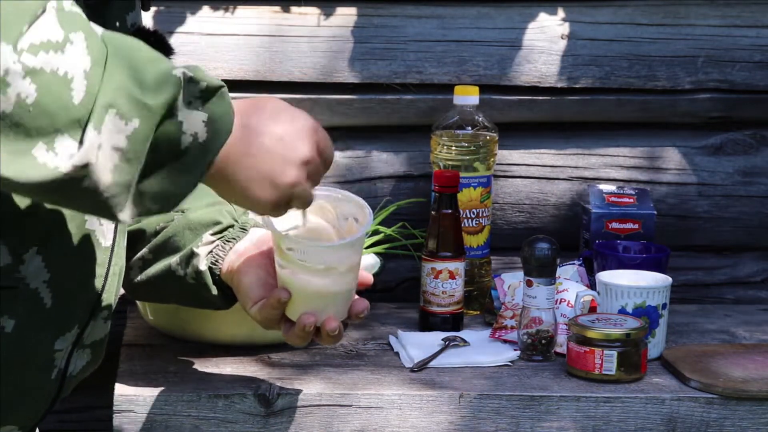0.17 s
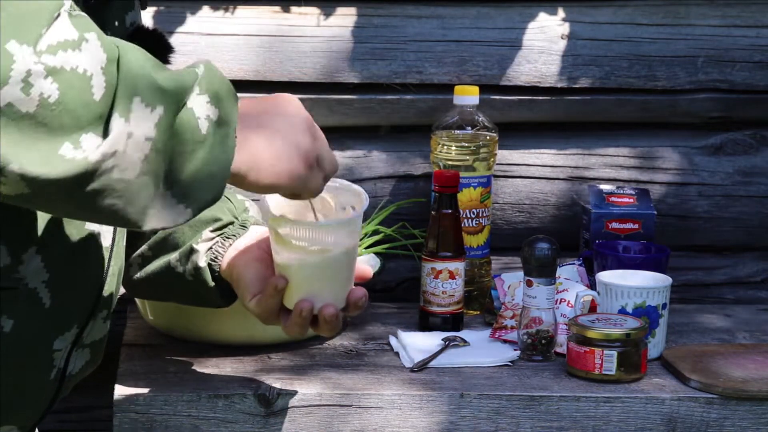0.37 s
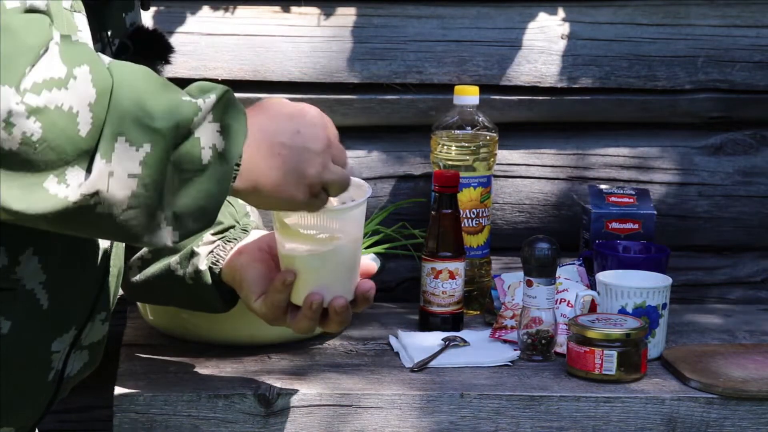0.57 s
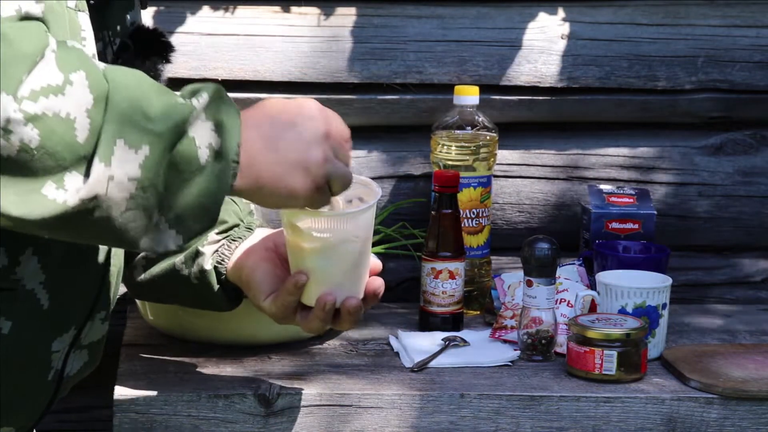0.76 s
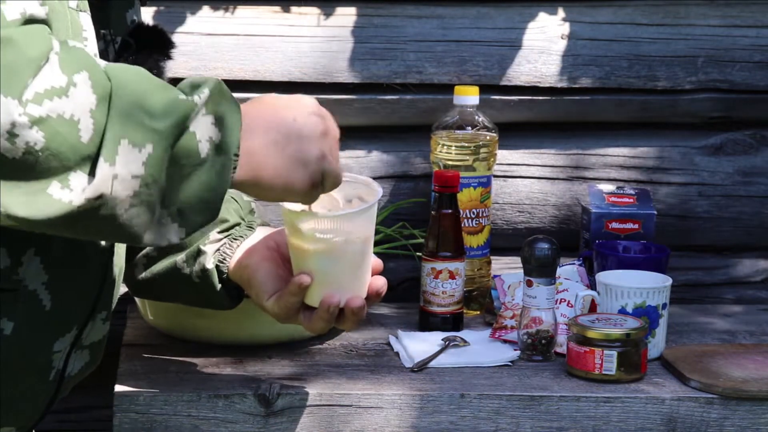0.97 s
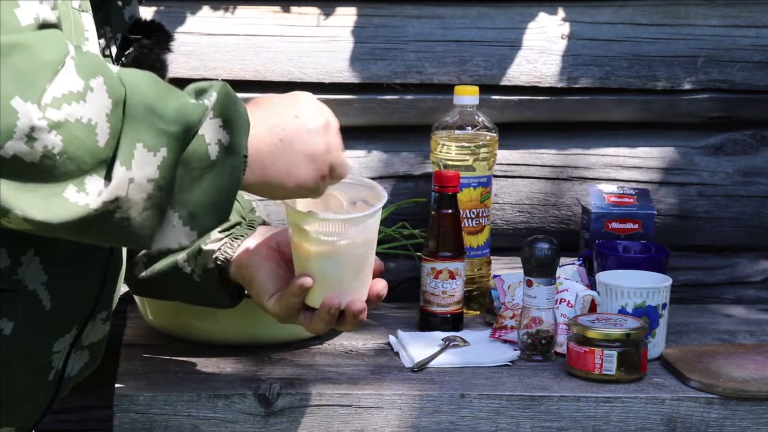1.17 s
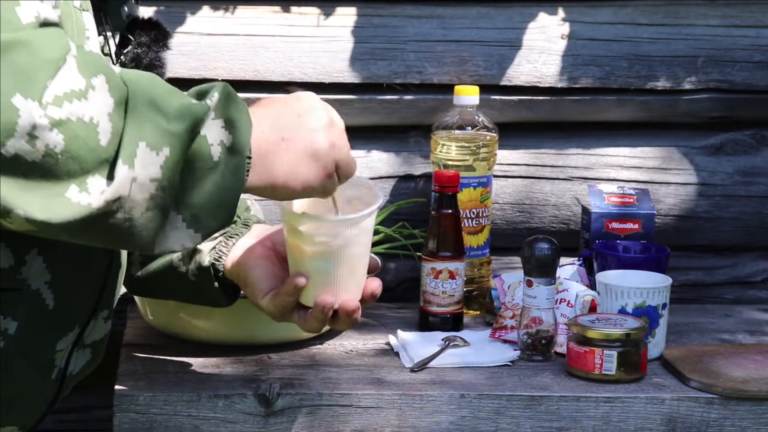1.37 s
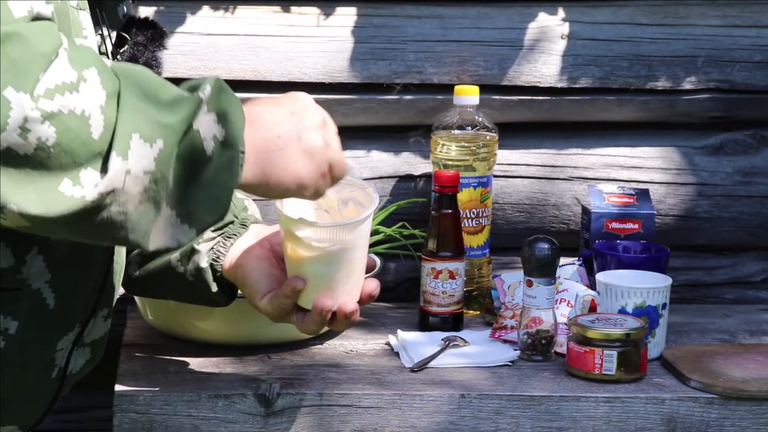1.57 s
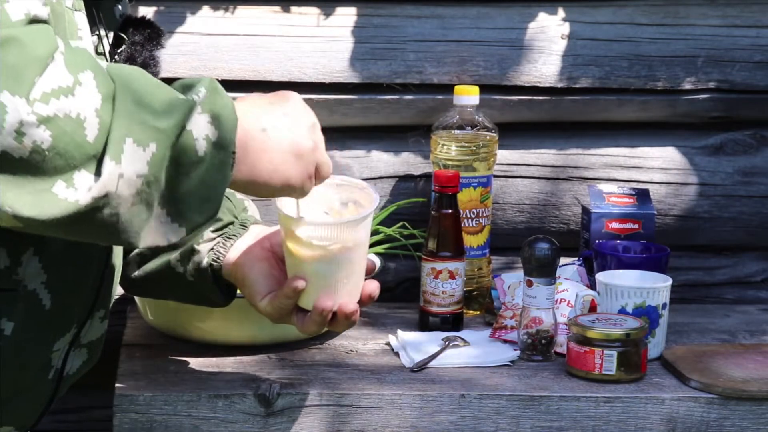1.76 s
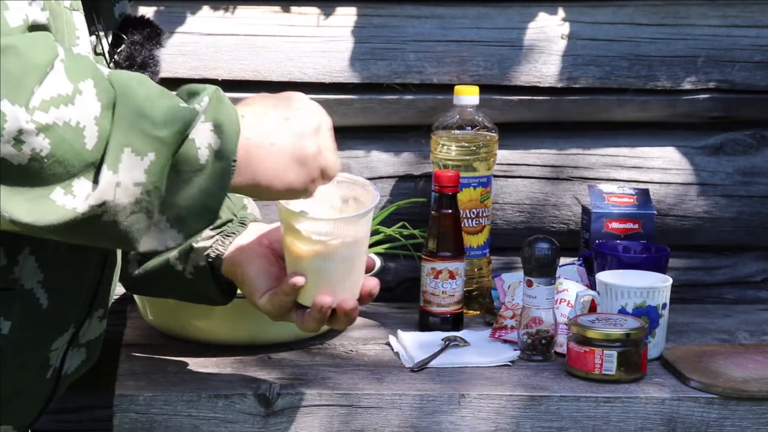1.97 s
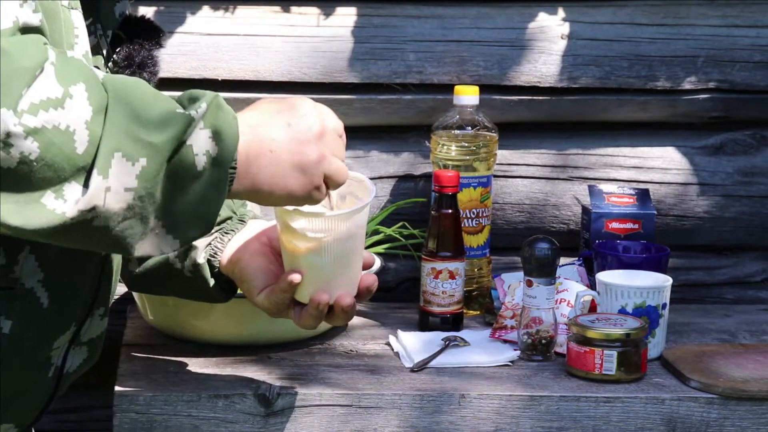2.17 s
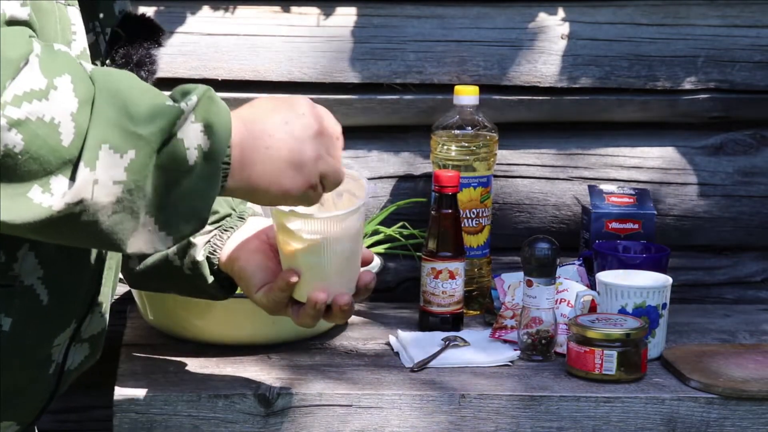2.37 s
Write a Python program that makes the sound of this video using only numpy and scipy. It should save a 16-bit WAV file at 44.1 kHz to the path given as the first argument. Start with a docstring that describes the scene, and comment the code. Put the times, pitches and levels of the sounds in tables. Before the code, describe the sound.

A spoon stirs thick sauce in a thin plastic cup, close and dry outdoors. Small clicks lead to a sharp, loud knock at 0.25 seconds with a short creak, then a dull scrape near 0.35. Uneven taps and rubs continue, with faint wet hiss and thin wavering squeaks around 0.9-1.4. Soft low thumps recur; firmer knocks come near 2.2. Faint steady air lies behind.

```python
"""Teaspoon in a plastic cup

Outdoors by a log wall, one microphone: a teaspoon whisks thick sauce in a thin hand-held cup.
Knocks, thumps, rubs and one early creak of the cup wall ring the same short, damped modes.
Wet hiss and low slosh are shaped noise; thin high tones, wavering near-sines, pass for a while.
Behind it all lies a steady, faint bed of air noise; no echo is added."""
import sys
import numpy as np
from scipy import signal
from scipy.fft import rfft, irfft
from scipy.io import wavfile
from scipy.ndimage import uniform_filter1d

SR = 44100
rng = np.random.default_rng(int(sys.argv[2]) if len(sys.argv) > 2 else 0)


def file_out(sig):
    """Save sig as 16-bit WAV at sys.argv[1]."""
    # one column per channel
    cols = np.atleast_2d(sig).T
    # limit, then scale
    lim = np.clip(cols, -1, 1)
    pcm = np.round(lim * 32767).astype(np.int16)
    wavfile.write(sys.argv[1], SR, pcm)


N = 110250

# Spoon contacts: (time [s], mid ring peak [dB], then relative to it: low ring [dB], upper ring [dB],
# tick [dB]; chatter length [s])
SPOON_KNOCKS = [(0.053, -25, -58, 3.5, -23.5, 0.0021), (0.06, -28.5, -12.5, 0, -18, 0.0011),
                (0.144, -51, -42, -3, -37, 0.001), (0.204, -31.5, -35, 5, -7, 0.0029),
                (0.216, -12.5, -21, 11, -6.5, 0.00093), (0.252, 0.5, -7, -10, -26, 0.0013),
                (0.345, -19, -20, -3, -8.5, 0.002), (0.366, -28.5, -41, -26, -11, 0.0029),
                (0.503, -42, -21.5, 1.5, -34.5, 0.00067), (0.567, -18.5, -22, -4, -33.5, 0.002),
                (0.664, -44, -41, -1.5, -26, 0.00067), (0.828, -32.5, -8.5, 5, -11, 0.0015),
                (0.854, -42.5, -5.5, 2, -18.5, 0.0033), (0.935, -13, -22, -3.5, -1.5, 0.0022),
                (0.971, -27.5, -16.5, -7, -7, 0.0017), (1.018, -25.5, -16, -12.5, -33.5, 0.00099),
                (1.077, -20, -32, -6, -30.5, 0.0027), (1.149, -41, 6, 4, -40, 0.00077),
                (1.225, -25.5, -6.5, -51, -36, 0.0037), (1.293, -34.5, -0.5, -4, -21, 0.0013),
                (1.301, -38, 4.5, -32, -33, 0.0019), (1.348, -30, -7, -5, -26, 0.0018),
                (1.374, -17, -24, -1.5, -15, 0.0015), (1.454, -44.5, -23.5, -12, -10, 0.0016),
                (1.503, -47, -2.5, -21.5, -25, 0.0027), (1.541, -32, -40, -2.5, -15, 0.0035),
                (1.628, -30.5, -16.5, 1, -50, 0.0019), (1.664, -24.5, -12, -30.5, -52, 0.0018),
                (1.692, -30, 3.5, -36, -25.5, 0.002), (1.776, -58, 11, -14, -33, 0.002),
                (1.815, -36.5, -4, -38, -39, 0.0045), (1.888, -33, -16, -1, -31, 0.0016),
                (1.959, -20.5, -2, -52, -48, 0.0036), (2.048, -52.5, 10, -13, -19.5, 0.0012),
                (2.087, -33, -1, -18, -31.5, 0.0043), (2.152, -41.5, 5.5, 8.5, -40, 0.0013),
                (2.217, -13.5, -10, -33, -51, 0.0026), (2.254, -16, -18.5, -12, -11, 0.0054),
                (2.32, -31.5, -9.5, -16.5, -24, 0.0022), (2.426, -25.5, -14, -16.5, -57, 0.0018)]
# Soft low thumps of sauce against the wall: (time [s], peak level [dB])
SAUCE_THUMPS = [(0.05, -41.5), (0.566, -39), (1.011, -39), (1.177, -43.5), (1.229, -38), (1.685, -43),
                (1.951, -40), (2.209, -29), (2.256, -33), (2.317, -39)]
# Modes of the cup: (frequency [Hz], level within its group before spread [dB], 60 dB decay time [s])
CUP_MODES = [(121.9, -11, 0.053), (259, -11.5, 0.023), (368, -4.5, 0.029), (505, -1.5, 0.022),
             (730, -5, .025), (994, 0.5, 0.0083), (1283, 0, 0.014), (1644, -9.5, 0.005),
             (2374, 15.5, 0.0049), (2915, 9, .014), (3512, 4, 0.0072), (4712, -6.5, 0.0038),
             (8055, 1.5, 0.0019), (9810, 2, 0.0014), (13820, 2, 0.001)]
# Group of each mode: (0 thump, 1 low ring, 2 mid ring, 3 upper ring, 4 tick [index])
MODE_GROUPS = [0, 0, 1, 1, 1, 2, 2, 2, 3, 3, 3, 3, 4, 4, 4]
# Range each group is kept to: (lower edge [Hz], upper edge [Hz])
GROUP_RANGES = [(50, 320), (250, 900), (700, 1900), (1600, 5200), (6000, 15500)]
# Drag through the sauce: (time [s], dull rub level [dB], bright rub level [dB])
DRAG_LEVELS = [(0, -78.5, -73), (.72, -77.5, -83), (1.1, -60.5, -61), (1.75, -64, -70), (2.5, -62, -67)]
# Swishes along the wall: (time [s], length [s], dull rub level [dB], bright rub level [dB])
WALL_SWISHES = [(0.133, 0.16, -93, -56.5), (0.331, 0.032, -27, -38), (0.428, 0.072, -52, -63.5),
                (0.81, 0.17, -62.5, -66), (1.019, 0.1, -50.5, -61), (1.178, 0.15, -60.5, -92),
                (1.293, 0.065, -44.5, -58), (1.682, 0.016, -47, -84), (1.973, 0.017, -75, -79.5),
                (2.154, 0.019, -64, -64), (2.201, 0.031, -44, -55), (2.351, 0.04, -48, -54)]
# Wet hiss, course before its flutter: (time [s], level [dB])
WET_HISS_LEVELS = [(.8, -86), (.86, -64), (.9, -73), (.98, -62.5), (1.1, -73.5), (1.28, -77.5), (1.39, -51),
                   (1.48, -86), (1.8, -83.5), (1.97, -70), (2.15, -84), (2.27, -65.5), (2.4, -92.5)]
# Wet hiss, spectrum shape: (frequency [Hz], level per Hz [dB])
WET_HISS_SPECTRUM = [(2650, -42), (4500, -4.5), (12800, 1), (15900, -16), (16500, -27)]
# Creak of the cup wall: (time [s], slip rate before jitter [1/s], slip strength [dB])
CREAK_SLIPS = [(.242, 420, -36), (.248, 160, -11), (.257, 240, -15.5), (.27, 250, -9.5), (.28, 255, -20.5),
               (.292, 330, -26.5), (.298, 340, -55)]
# Creak push into thump, low, mid and upper modes: (strength added [dB])
CREAK_GROUP_PUSH = [0, 3.3, -8.5, -25.5]
# Thin tones, one glide each: (time [s], frequency before smoothing and wobble [Hz])
TONE_GLIDES = [
    [(.88, 8400), (.905, 8100), (.93, 8900), (.97, 8500), (1.0, 8150), (1.02, 9300), (1.075, 8500),
     (1.09, 8800), (1.12, 8200)],
    [(.98, 11600), (1.03, 12600), (1.1, 10900), (1.16, 12150), (1.32, 10700)],
    [(1.25, 13700), (1.36, 12300)],
    [(.87, 12300), (.92, 13200), (1.04, 14100), (1.1, 13400)],
    [(1.25, 8600), (1.34, 8200)],
    [(1.26, 6800), (1.33, 6300)],
]
# Height of each thin tone before flicker: (level [dB])
TONE_LEVELS = [-67, -73, -72, -77, -74, -76]
# Air noise, spectrum shape: (frequency [Hz], level per Hz [dB])
AIR_SPECTRUM = [(18, -30.5), (30, 0), (3660, -17), (5300, -21), (16500, -47.5)]

MODE_SPREAD_DB = 2  # chance in each mode's strength, contact by contact
THUMP_S = 0.01
RISE_S, RISE_SHARE = 0.0014, 0.25  # chatter swell: fixed part, plus a share of its length
CHATTER_SPIKE_DB = 4.0
SMEAR_DB, SMEAR_S = -14.5, 0.023  # drag after a contact: strength at a 0 dB peak, decay
SMEAR_LOSS_DB = 0.45  # hard contacts smear less: dB lost per dB of peak
RUB_PER_S, RUB_SPIKE_DB, RUB_PATCHY_DB = 3800, 1.5, 2.5
LOW_RUB_DB = -8.5  # low ring relative to the mid ring
SWISH_RISE_S, SWISH_FALL_S = 0.012, 0.013
HISS_FLUTTER_DB = 3.3
SLOSH_HZ, SLOSH_DB, SLOSH_LUMPY_DB = 160, -76.5, 8.5  # upper edge, level before lumps, lumps
CREAK_JITTER = 0.057  # share of the slip rate
TONE_WOBBLE, TONE_FLICKER_DB, TONE_FADE_S = 0.005, 3.5, 0.0057  # wobble: share of the frequency
AIR_DB = -74
CUTOFF_HZ = 16300


def amp(db):
    """Decibels to amplitude."""
    return 10 ** (np.asarray(db) / 20)


def rms_one(x):
    """Scale to an rms of 1."""
    return x / np.sqrt(np.mean(x ** 2) + 1e-20)


def in_time(rows):
    """Straight lines through the columns of a table whose first column is time."""
    s, *columns = np.transpose(rows)
    return [np.interp(np.arange(N) / SR, s, column) for column in columns]


def drift(rate_hz):
    """Slow chance of rms 1: noise through two equal one-pole low-passes."""
    r = np.exp(-2 * np.pi * rate_hz / SR)
    noise = rng.standard_normal(N + SR)
    return rms_one(signal.lfilter([1], [1, -2 * r, r * r], noise)[SR:])  # first second: settling


def coloured(points):
    """Steady noise of rms 1, its spectrum interpolated over log frequency."""
    hz, db = np.transpose(points)
    f = np.maximum(np.arange(N // 2 + 1) * SR / N, 1)
    gain = amp(np.interp(np.log(f), np.log(hz), db))
    return rms_one(irfft(rfft(rng.standard_normal(N)) * gain, N))


def spiky(shape, spike_db):
    """Grains of random sign, with exponentially spread decibels for the odd strong one."""
    return amp(spike_db * np.minimum(rng.exponential(1, shape), 5)) * rng.choice([-1, 1], shape)


def knocks():
    """Spoon knocks ring the upper four groups, sauce thumps the lowest; each to its own peak."""
    s, db, low, upper, tick, length = np.transpose(SPOON_KNOCKS)
    thump_s, thump_db = np.transpose(SAUCE_THUMPS)
    hit = contact(length[:, None], db)
    thud = contact(np.full((len(SAUCE_THUMPS), 1), THUMP_S), thump_db)
    parts = [(thump_s, thump_db, thud)]
    parts += [(s, db + part, hit) for part in (low, 0, upper, tick)]
    out = np.zeros(N)
    for group, (start, level, push) in enumerate(parts):
        rung = cup(group, push, MODE_SPREAD_DB)
        rung = rung * amp(level)[:, None] / np.abs(rung).max(axis=1, keepdims=True)
        at = (start[:, None] * SR).astype(int) + np.arange(push.shape[1])
        out += np.bincount(at.ravel(), rung.ravel(), N + SR)[:N]
    return out


def contact(length, peak_db):
    """A chatter of tiny impacts swells and dies, then drags on as a smear; one row per contact."""
    t, rise = np.arange(SR // 6) / SR, RISE_S + RISE_SHARE * length
    grains = spiky((len(length), len(t)), CHATTER_SPIKE_DB)
    chatter = grains * (t / rise).clip(0, 1) ** 2 * np.exp(-np.maximum(t - rise, 0) / length)
    chatter = chatter / np.linalg.norm(chatter, axis=1, keepdims=True)
    smear = grains / grains.std() * np.exp(-t / SMEAR_S) / np.sqrt(SMEAR_S * SR) * (t > rise)
    return chatter + amp(SMEAR_DB - SMEAR_LOSS_DB * peak_db[:, None]) * smear


def cup(group, push, spread_db=0):
    """A push rings one group of damped cup modes, kept to its range; rows are separate contacts."""
    out = 0
    for k, (mode_group, (hz, db, t60)) in enumerate(zip(MODE_GROUPS, CUP_MODES)):
        if mode_group == group:
            strength = amp(db + rng.normal(0, spread_db, push.shape[:-1] + (1,)))
            out = out + strength * (-1) ** k * ring(push, hz, t60)  # signs alternate
    band = signal.butter(2, GROUP_RANGES[group], "band", fs=SR, output="sos")
    return signal.sosfilt(band, out)


def ring(clicks, hz, t60):
    """A two-pole resonance: a unit click starts a decaying sine of height 1."""
    r, w = amp(-60 / (t60 * SR)), 2 * np.pi * hz / SR
    return signal.lfilter([0, np.sin(w)], [1, -2 * r * np.cos(w), r * r], clicks + 1e-18)


def stirring():
    """The spoon rubs the cup wall, harder in each swish; the sauce hisses wetly and sloshes low."""
    dull, bright = amp(in_time(DRAG_LEVELS))
    t = np.arange(N) / SR
    for s, length, dull_db, bright_db in WALL_SWISHES:
        rise = np.clip((t - s) / SWISH_RISE_S, 0, 1)
        swish = rise * np.exp(-np.maximum(t - s - length, 0) / SWISH_FALL_S)
        dull = dull + amp(dull_db) * swish
        bright = bright + amp(bright_db) * swish
    dull_rub = dull * (rub(group=2) + amp(LOW_RUB_DB) * rub(group=1))
    return dull_rub + bright * rub(group=3) + wet_hiss() + slosh()


def rub(group):
    """Dense, patchy grains on the cup wall ring one group; rms 1."""
    landed = rng.random(N) < RUB_PER_S / SR
    return rms_one(cup(group, spiky(N, RUB_SPIKE_DB) * landed * amp(RUB_PATCHY_DB * drift(36.0))))


def wet_hiss():
    """Coloured noise swells and flutters, as wet sauce hisses."""
    return amp(in_time(WET_HISS_LEVELS)[0] + HISS_FLUTTER_DB * drift(40.0)) * coloured(WET_HISS_SPECTRUM)


def slosh():
    """Low band noise moves in slow lumps, as thick sauce sloshes."""
    band = signal.butter(2, [40, SLOSH_HZ], "band", fs=SR, output="sos")
    low_noise = rms_one(signal.sosfilt(band, rng.standard_normal(N)))
    return amp(SLOSH_DB + SLOSH_LUMPY_DB * drift(2.0)) * low_noise


def creak():
    """Under the spoon the wall sticks and slips; each uneven slip rings all groups but the tick."""
    rate, db = in_time(CREAK_SLIPS)
    n = np.arange(N)
    on = (n > CREAK_SLIPS[0][0] * SR) & (n < CREAK_SLIPS[-1][0] * SR)
    turns = np.cumsum(on * rate * (1 + CREAK_JITTER * drift(170.0)) / SR)
    slips = np.diff(np.floor(turns), prepend=0) > 0  # one slip per whole turn
    return sum(cup(group, slips * amp(db + part)) for group, part in enumerate(CREAK_GROUP_PUSH))


def tones():
    """Faint near-sines glide, waver in frequency and flicker in level over the stirring."""
    out, t = np.zeros(N), np.arange(N) / SR
    for rows, db in zip(TONE_GLIDES, TONE_LEVELS):
        glide = uniform_filter1d(in_time(rows)[0], size=SR // 80)
        hz = glide * (1 + TONE_WOBBLE * drift(56.0))
        gate = np.clip(np.minimum(t - rows[0][0], rows[-1][0] - t) / TONE_FADE_S, 0, 1)
        level = amp(db + TONE_FLICKER_DB * drift(23.0))
        out += gate * level * np.sin(2 * np.pi * np.cumsum(hz) / SR)
    return out


def air():
    """The bed behind the cup: steady noise, mostly low."""
    return amp(AIR_DB) * coloured(AIR_SPECTRUM)


def scene():
    """The cup and spoon over the air, summed to one channel."""
    return (knocks() + stirring() + creak() + tones() + air())[None]


def record(dry):
    """The microphone chain: peaks clip at full scale, then a steep low-pass cuts the top."""
    top_cut = signal.cheby2(12, 70, CUTOFF_HZ, fs=SR, output="sos")
    return signal.sosfilt(top_cut, np.clip(dry, -1, 1))


dry = scene()
out = record(dry)
file_out(out)
```